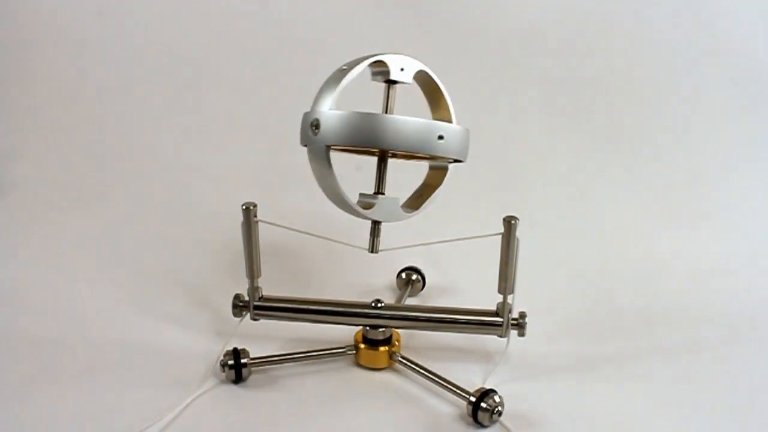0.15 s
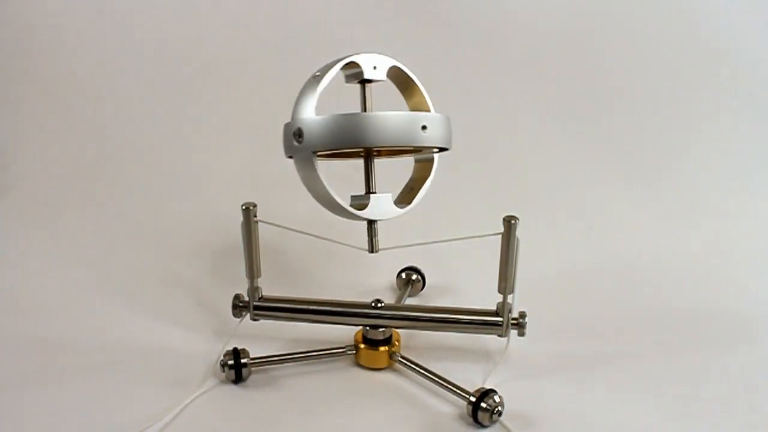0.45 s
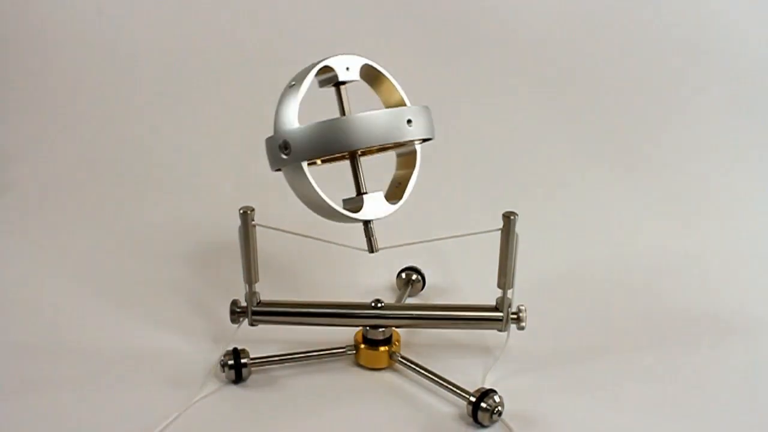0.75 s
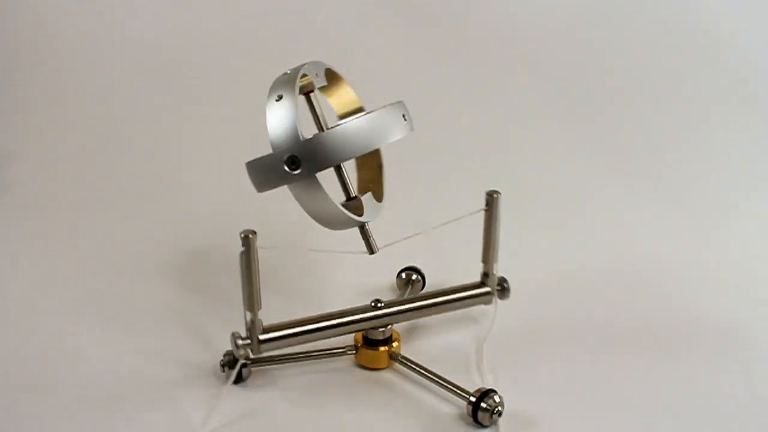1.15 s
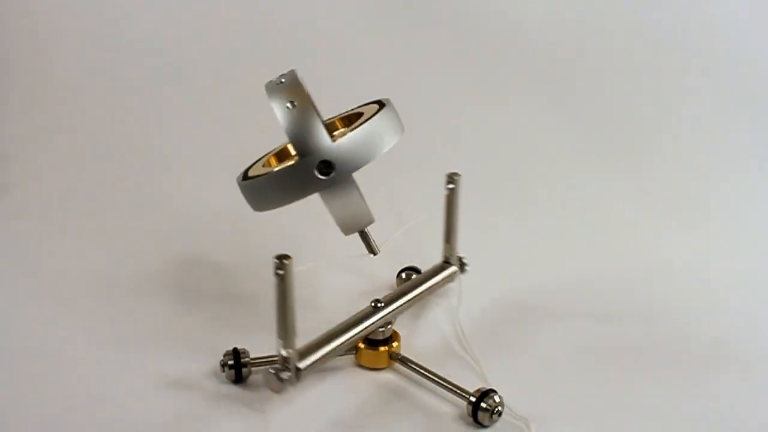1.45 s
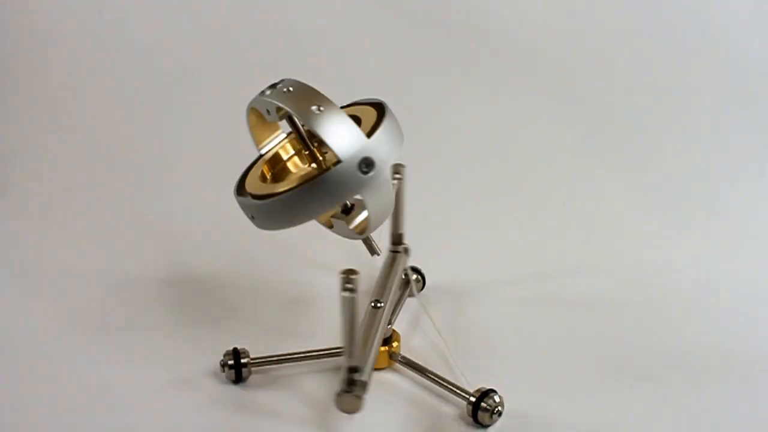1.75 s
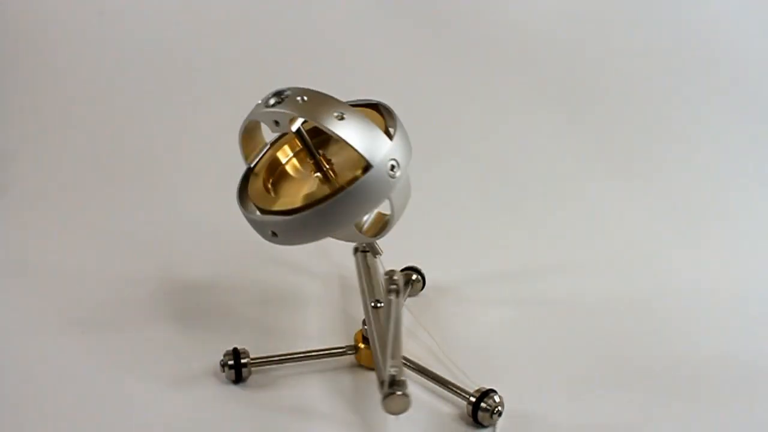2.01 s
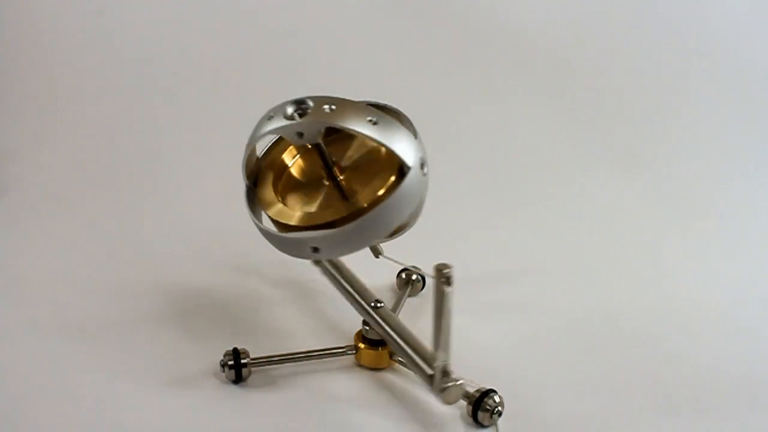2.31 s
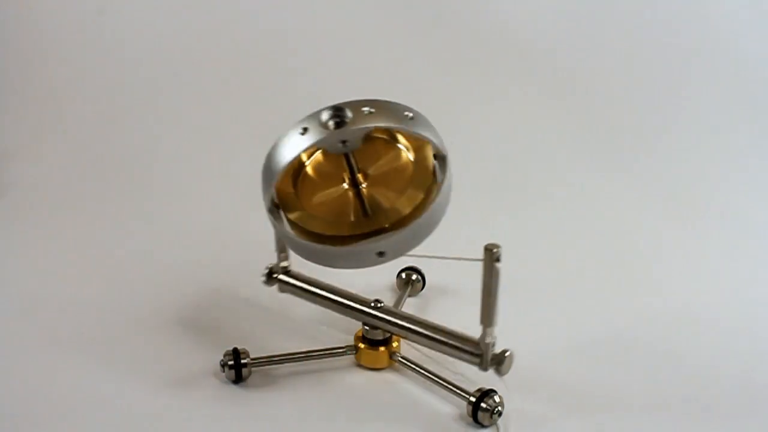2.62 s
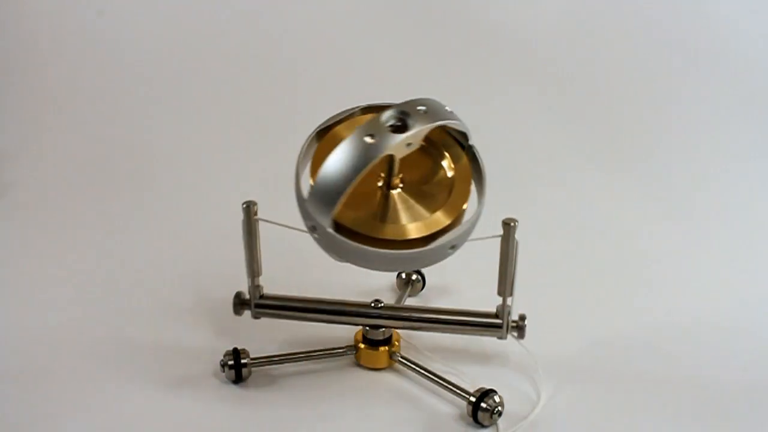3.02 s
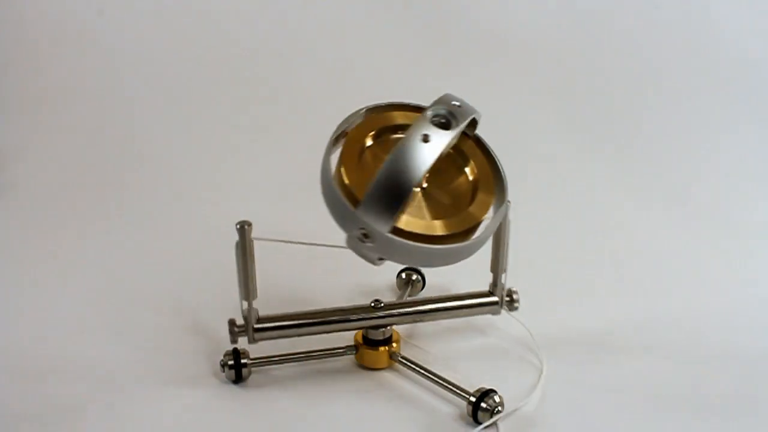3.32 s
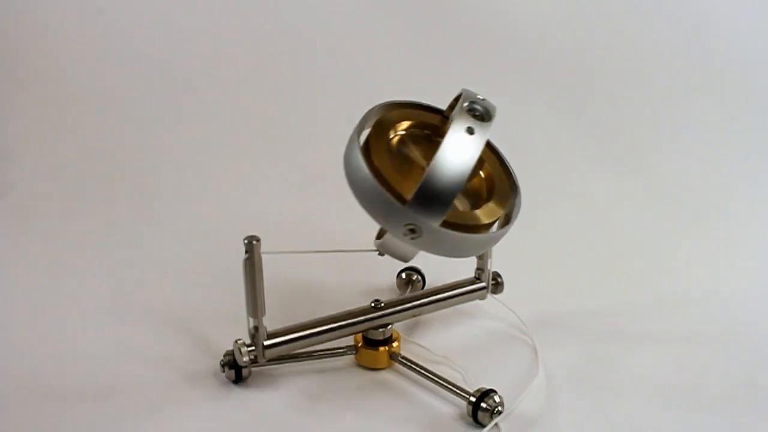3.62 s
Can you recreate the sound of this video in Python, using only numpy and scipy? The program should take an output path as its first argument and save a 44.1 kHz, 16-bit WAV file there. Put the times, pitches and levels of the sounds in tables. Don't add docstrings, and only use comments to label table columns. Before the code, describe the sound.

Fast-spinning gyroscope rotor gives a continuous metallic whine and hiss, wavering as it wheels round.

```python
import sys
import numpy as np
from scipy import signal
from scipy.fft import rfft, irfft
from scipy.io import wavfile
from scipy.ndimage import uniform_filter1d

SR = 44100
rng = np.random.default_rng(int(sys.argv[2]) if len(sys.argv) > 2 else 0)


def unload_wav(signal):
    wavfile.write(
        sys.argv[1],
        SR,
        np.round(np.clip(np.atleast_2d(signal).T, -1, 1) * 32767).astype(np.int16),
    )


N = 165816

SPIN_HZ, RUN_DOWN_HZ_PER_S = 138.62, 0.69
WHEEL_DEG_PER_S = 90


def from_db(db):
    return 10 ** (np.asarray(db) / 20)


def rms_one(x):
    return x / np.sqrt(np.mean(x ** 2) + 1e-20)


def drift(rate_hz):
    r = np.exp(-80 * np.pi * rate_hz / SR)
    white = rng.standard_normal(N // 40 + 1002)
    slow = signal.lfilter([1], [1, -2 * r, r * r], white)[1000:]
    return np.interp(np.arange(N) / 40, np.arange(len(slow)), rms_one(slow))


def resonate(x, f_hz, width_hz):
    r = np.exp(-np.pi * width_hz / SR)
    return signal.lfilter([1, 0, -1], [1, -2 * r * np.cos(2 * np.pi * f_hz / SR), r * r], x)


def coloured(points):
    f_hz = np.maximum(np.fft.rfftfreq(N, 1 / SR), 1)
    at_hz, at_db = np.transpose(points)
    octaves_outside = np.maximum(np.log2(at_hz[0] / f_hz), np.log2(f_hz / at_hz[-1])).clip(0)
    shape_db = np.interp(np.log(f_hz), np.log(at_hz), at_db) - 18 * octaves_outside
    return rms_one(irfft(rfft(rng.standard_normal(N)) * from_db(shape_db), N))


def after(start_s, rise_s):
    return np.clip((np.arange(N) / SR - start_s) / rise_s, 0, 1)


def beam_db(swing_db, lobes, aim_deg):
    wheel_deg = WHEEL_DEG_PER_S * np.arange(N) / SR
    return swing_db * np.cos(lobes * np.radians(wheel_deg - aim_deg))


def flash_db(f_hz):
    flash_hz = [1512, 1630, 3985, 4450, 5222, 9230, 10240, 10725, 11480, 6040, 3160, 14480]
    # [t/s, level/dB, half length/s]
    flashes = [
        [(1.83, 11, 0.031), (2.7, 0, 0.0096), (1.91, 1.5, 0.021), (2.4, 7.5, 0.024), (2.13, -2, 0.044),
         (2.23, -12, 0.015), (2.42, -6, 0.07), (1.7, -8, 0.055), (0.54, 8, .1)],
        [(3.06, 8, 0.017), (3.16, 5.5, .02), (3, 0.5, 0.074), (3.345, -4, 0.01), (3.21, -4, .02),
         (3.415, 5, 0.017), (3.447, -7, .012), (3.53, -4, 0.012), (3.48, 4, 0.013), (3.58, 6, 0.023)],
        [(.08, -4, 0.058), (.58, -2, 0.095), (.96, 6, 0.021), (1.73, 4.5, 0.046), (1.89, 4, 0.025),
         (2.06, -4.5, 0.035), (2.12, 7.5, 0.03)],
        [(.4, 7, 0.018), (.46, 4, .02), (.97, 6, .03), (1.16, 2, 0.048), (2.55, -2, .06), (3.37, 0, .1)],
        [(1.59, 3.4, 0.018), (1.655, 11, 0.023), (1.82, 2.6, 0.027), (2.02, 5.1, 0.044), (2.8, 5, .03),
         (3.28, 8, .04), (3.55, 5.7, .04)],
        [(1.4, 5, 0.08), (1.66, -5, 0.042), (1.95, 5.5, 0.11)],
        [(.3, -1.5, 0.15), (1.5, 5, .1), (2.02, 11, 0.093)],
        [(.85, 5.5, 0.27), (1.22, -15, 0.091), (1.59, 10, 0.022), (1.9, -6, 0.083), (3.63, 7, .08)],
        [(1.6, 2.5, 0.27), (1.15, -16, 0.11)],
        [(1.38, 2.7, 0.031), (3.4, 2.3, .1)],
        [(2.44, 3.5, 0.13), (1.92, -9, 0.16)],
        [(.8, 3, .2), (2.0, -3, .3)],
    ]
    t = np.arange(N) / SR
    near = [rows for at_hz, rows in zip(flash_hz, flashes) if abs(f_hz / at_hz - 1) < 0.012]
    return sum(db * np.exp(-((t - s) / half_s) ** 2) for rows in near for s, db, half_s in rows)


def shaft(turns, load_db):
    # [multiple of spin, level/dB, swing/dB, lobes per turn, aim/deg]
    low_tones = [(1, -70.5, 7.5, 0.91, 48), (3, -74.5, 6.5, 0.66, -35), (5, -78, 13.5, 0.89, 49),
                 (6, -70, 9.5, 1.28, 57), (7, -66, 4.5, 1.87, -75), (8, -63, 9.5, 0.804, -167.2),
                 (9, -73, 6.5, 0.5, 330), (10, -63, 2, 0.93, -108.1), (11, -67, -3, 1.44, 52),
                 (12, -68, 4.5, 0.77, 302), (13, -65.5, 7.5, 1.15, 57), (14, -60, 3.5, 1.4, -119.2),
                 (15, -67, 8, 1.7, -62), (16, -82.5, 20.5, 2.4, -44), (17, -70.5, 2.5, 1.35, -24),
                 (18, -76.5, 16, 0.96, -99.1), (20, -78, -15, 1.4, 89)]
    high_tones = [(22, -60, 4.3, 0.93, 91), (23, -56.5, 3.4, 2.27, 67), (24, -62.5, 6.1, 1.16, -35),
                  (25, -66, 4.7, 0.43, -49), (27, -62, 1.7, 0.27, -29), (29, -51.5, 2.1, 1.13, 77),
                  (30, -53.5, 2.3, 0.7, 120), (31, -62.5, 5.6, 0.7, 239), (32, -60.5, 14, 0.68, -42),
                  (38, -70, 1.7, 5.1, 51), (43, -61, 5.3, 1.7, 73), (44, -53, 3.6, 1.56, 120),
                  (45, -61, 9.6, 0.96, -182.1), (47, -58, 14, 0.46, -220.0), (52, -61.5, 3.4, 3.36, -1),
                  (54, -60.5, 5.4, 0.5, -62), (33, -65.5, 4.3, 0.8, 295)]
    # [level/dB, swing/dB, lobes per turn, aim/deg]
    cage_multiples = [29.55, 31.4]
    cage = [(-63.5, 7.5, 1.3, 134), (-66, -2, 1.2, 210)]
    # [width/Hz, lift as gain]
    sharp_hz = [1509.5, 1635, 3993, 5222]
    sharp = [(4, 8.1), (6, 4.66), (14, 4.65), (14, 7.9)]
    load_share = 0.35
    rough, waver_hz = 0.17, 14

    rows = [(m, db, beam, 0) for m, db, *beam in low_tones]
    rows += [(11.76, -67.5, (4.8, 1, 93), 0)]
    rows += [(m, db, beam, load_share) for m, db, *beam in high_tones]
    rows += [(m, db, beam, load_share) for m, (db, *beam) in zip(cage_multiples, cage)]

    spin_hz = np.gradient(turns) * SR
    out = 0
    for multiple, db, beam, follows in rows:
        phase = 2 * np.pi * (multiple * turns + rng.random())
        tone = (1 + rough * drift(waver_hz)) * np.cos(phase)
        tone += rough * drift(waver_hz) * np.sin(phase)
        lift = 1
        for f_hz, (width_hz, gain) in zip(sharp_hz, sharp):
            if abs(multiple * SPIN_HZ / f_hz - 1) < 0.06:
                lift = lift + gain / (1 + (2 * (multiple * spin_hz - f_hz) / width_hz) ** 2)
        level_db = db + beam_db(*beam) + follows * load_db + flash_db(multiple * spin_hz.mean())
        out = out + rms_one(tone) * lift * from_db(level_db)
    return out


def bearings(turns, load_db):
    # [f/Hz, density/dB per Hz]
    hiss = [(600, -9), (1500, -4.5), (3000, -5), (5000, -0.5), (6800, -8), (8200, -2.5), (10500, 5),
            (15000, -5)]
    frame_hz = [1620, 2445, 3165, 3978, 4045, 1512, 4450, 5220, 6030, 6500, 7135, 7475, 8575]
    rotor_hz = [9230, 9480, 10240, 10725, 11230, 11600, 12250, 13040, 13455, 14200, 14480, 15330, 9600,
                11480]
    # [width/Hz, level/dB, swing/dB, lobes per turn, aim/deg]
    mode_rows = [(25, -58, 11, 0.5, -231.0), (24.3, -62, 1.5, 1.25, -117.0), (61.5, -61, 4, 0.63, -267.0),
                 (30.5, -54.5, 9.5, 0.44, 83), (76.4, -50.5, 1.5, 0.58, 104), (25.2, -68, 8.5, 0.55, 206),
                 (29.8, -52, 3.5, 0.79, 112), (29, -63, 6, 2.28, -21), (240, -49.5, 5, 1.84, -51),
                 (470, -49, 0.7, 2.5, 88), (60, -57.5, 3, 2.5, 19), (52.5, -54, 1.5, 0.78, 26),
                 (50, -55.5, 1, 1.9, -6),
                 (194, -50.5, 2, 1.31, -129.0), (220, -50.5, 2.4, 0.99, 72), (50, -54.5, 7.1, 0.23, 197.0),
             (113, -43.5, 4.55, 1.375, -85), (333, -45, 3.3, 0.68, 90), (219, -45.5, 3, 1.32, 113),
             (450, -51.5, 5.4, 1.85, -31), (80.4, -52, 6, 0.61, 99.0), (35, -51.5, 3.6, 1, -120.0),
             (170, -51.5, 4.9, 1.8, 31), (90, -49.5, 3, 1.8, 65), (60, -49.5, 3.6, 1.63, -72),
             (50, -57, 8.7, 0.8, 31), (60, -56.5, 3, 1.4, 142)]
    # [swing/dB, lobes per turn, aim/deg]
    fine_beams = [(4, 3.55, -9), (2, 3.47, -29), (5, 3.94, 2), (0.5, 5.02, -28), (1.3, 3.74, -21),
                  (5.5, 2.73, 37), (1.5, 5.17, 25), (3, 4.16, -21), (3, 2.98, -26), (2.5, 3.57, -28),
                  (4, 3.8, -16), (2.2, 3.57, -13), (1, 5.4, 1), (3, 5.73, -4), (3, 4.93, -35),
                  (1, 5.82, -41), (1, 4.46, -14), (2, 2.45, 67), (2, 3, 53.0), (-2, 4.4, -38),
                  (2.5, 7.77, -16), (2, 2.25, -57), (1.5, 6.3, 17.0), (3.5, 3.7, -28), (0.5, 6.5, 12),
                  (-3.5, 2.5, 50), (3, 3.7, 65)]
    steady_hz = (1512, 1620, 4450, 5220)
    steadiness = 0.75
    hiss_db, hiss_load_share, mode_load_share = -43, 0.16, 0.51
    runout_depth, rattle_db, patchy_db = 0.11, 0.63, 1.03
    gripped_hz, grip_s, grip_db = 4450, 1.26, -5

    pulse = (1 + runout_depth * np.cos(2 * np.pi * turns)) * from_db(rattle_db * drift(42))
    out = from_db(hiss_db + hiss_load_share * load_db) * coloured(hiss) * pulse
    for f_hz, (width_hz, db, *beam), fine in zip(frame_hz + rotor_hz, mode_rows, fine_beams):
        mode = resonate(rng.standard_normal(N) * pulse, f_hz, width_hz)
        mode = resonate(mode, f_hz, (3 if f_hz < 12000 else 8) * width_hz)
        if f_hz in steady_hz:
            power = uniform_filter1d(rms_one(mode) ** 2 + 0.01, size=220)
            mode = mode / power ** (steadiness / 2)
        level_db = db + beam_db(*beam) + beam_db(*fine) + patchy_db * drift(4.5) + flash_db(f_hz)
        if f_hz > 2800:
            level_db += mode_load_share * load_db
        if f_hz == gripped_hz:
            level_db += grip_db * after(grip_s, 0.03)
        out += rms_one(mode) * from_db(level_db)
    return out


def room():
    # [f/Hz, density/dB per Hz]
    air = [(15, -38), (25, -13), (102, -2.5), (163, -5.5), (217, -6), (335, -4), (600, -6), (900, -3.5),
           (1170, -3.5), (1980, -120)]
    # [f/Hz, level/dB, waver/dB]
    hum_rows = [(50, -69.5, 2.5), (99.5, -67.5, -0.5), (348, -76.5, 3.5)]
    air_db = -58.5
    t = np.arange(N) / SR
    hum = 0
    for f_hz, db, waver_db in hum_rows:
        sine = np.sqrt(2) * np.sin(2 * np.pi * (f_hz * t + rng.random()))
        hum = hum + from_db(db + waver_db * drift(3)) * sine
    return from_db(air_db) * coloured(air) + hum


def knock(start_s, db, f_hz, t60_s):
    t = np.maximum(np.arange(N) / SR - start_s, 0)
    onset = np.minimum(t * f_hz / 2, 1)
    return from_db(db - 60 * t / t60_s) * onset * np.sin(2 * np.pi * f_hz * t)


def stand():
    # [t/s, level/dB]
    swivel = [
        (0.95, -72),
        (1.1, -51),
        (1.3, -46.5),
        (1.48, -58),
        (1.66, -50),
        (1.9, -53.5),
        (2.4, -50.5),
        (3.0, -52),
        (3.5, -54.5),
    ]
    # [f/Hz, density/dB per Hz]
    rub = [(1800, 1), (2500, -0.5), (3600, 3.5), (5300, -4.5)]
    # [t/s, level/dB]
    ticks = [
        (1.272, -50),
        (3.028, -50),
        (3.341, -46),
    ]
    tick_hz = (2050, 2300)
    # [t/s, level/dB, f/Hz]
    thud_rows = [
        (1.531, -62, 138),
        (1.909, -47.5, 136),
        (2.269, -48.5, 150),
    ]
    tick_t60_s, thud_t60_s = 0.05, 0.19
    scrape_db, scrape_s = -4, 0.012

    t = np.arange(N) / SR
    effort = from_db(np.interp(t, *np.transpose(swivel)) + 1.5 * drift(8))
    for s, db in ticks:
        effort += from_db(db + scrape_db) * np.exp(-((t - s - scrape_s / 2) / scrape_s) ** 2)
    out = effort * coloured(rub)
    out += sum(knock(s, db, f_hz, tick_t60_s) for s, db in ticks for f_hz in tick_hz)
    out += sum(knock(s, db, f_hz, thud_t60_s) for s, db, f_hz in thud_rows)
    return out


def scene():
    # [t/s, level/dB]
    load_points = [(0.0, -42.5), (0.11, -39), (0.87, -35), (1.2, -37.5), (1.35, -33.5), (1.51, -30.5),
                   (1.54, -35), (1.58, -38.5), (1.61, -36), (1.96, -35.5), (1.97, -34), (2.11, -39),
                   (2.38, -34.5), (3.32, -35.5), (3.62, -34), (3.76, -39.5)]
    t = np.arange(N) / SR
    turns = SPIN_HZ * t - RUN_DOWN_HZ_PER_S * t ** 2 / 2
    load_db = np.interp(t, *np.transpose(load_points))
    load_db = load_db - load_db.mean()
    mono = shaft(turns, load_db) + bearings(turns, load_db) + room() + stand()
    return np.array([mono, mono])


def top_cut(x):
    return signal.sosfilt(signal.butter(12, 16860, fs=SR, output="sos"), x)


def record(dry):
    cutoff_hz = 15720
    low_pass = signal.ellip(14, 0.5, 80, cutoff_hz, fs=SR, output="sos")
    mix = signal.sosfilt(low_pass, dry)
    return top_cut(mix)


dry = scene()
out = record(dry)
unload_wav(out)
```